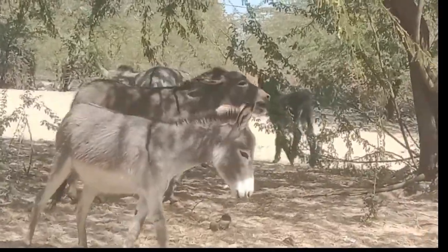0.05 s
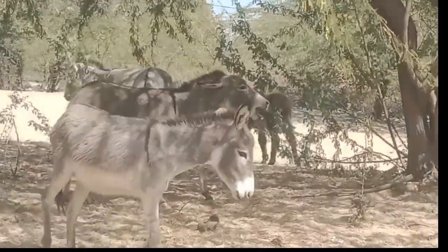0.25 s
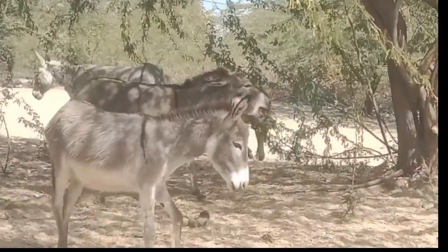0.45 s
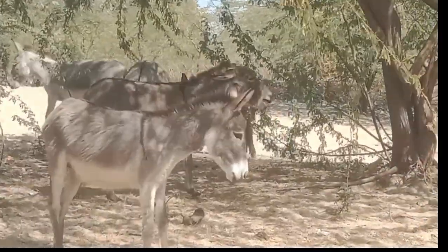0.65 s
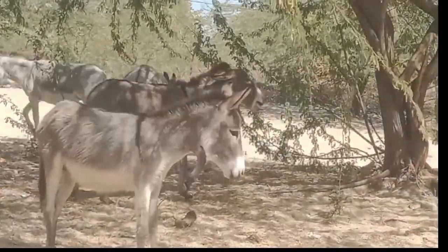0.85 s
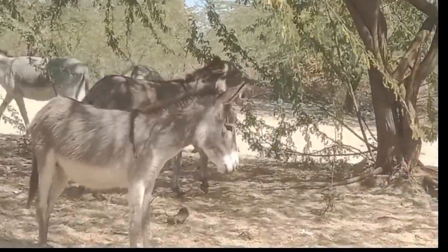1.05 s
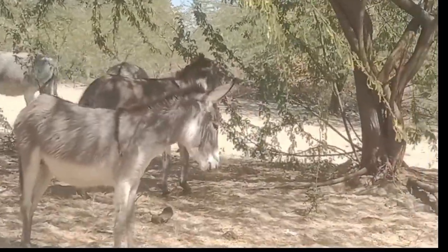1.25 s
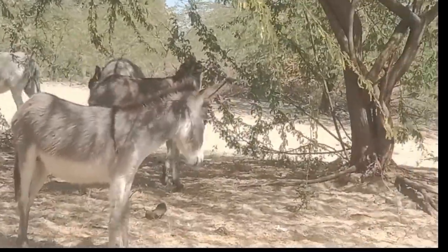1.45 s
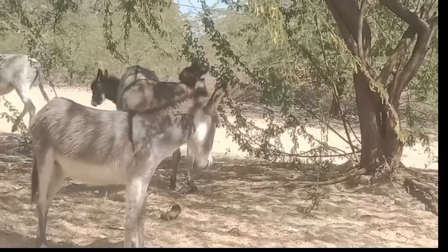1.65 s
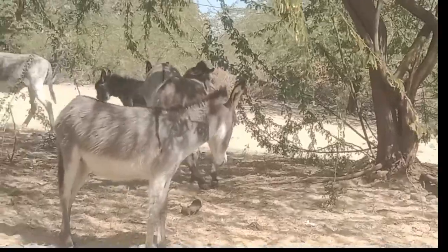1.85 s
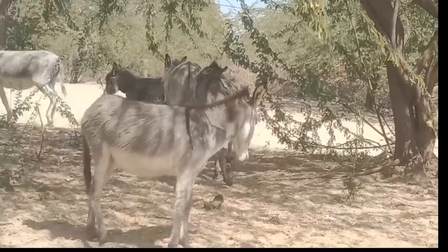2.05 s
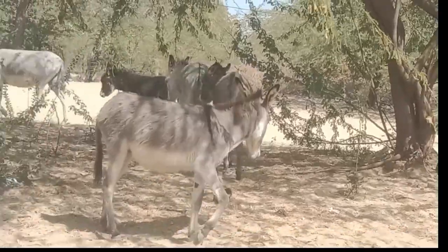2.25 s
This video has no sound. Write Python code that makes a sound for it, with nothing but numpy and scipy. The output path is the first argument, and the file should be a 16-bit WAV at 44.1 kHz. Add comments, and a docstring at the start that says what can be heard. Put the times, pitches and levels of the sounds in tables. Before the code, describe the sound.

A donkey brays: a wheezing in-breath, a loud rasping haw, another wheeze, then a weaker haw that sinks to a grunt. It is heard outdoors with a faint echo from trees, over a thin hiss and low rumble.

```python
"""A wheezing in-breath opens a donkey's bray: then a loud rasping haw, a second wheeze,
and a weaker haw that sinks to a grunt. The vocal folds give a clean low note and a rasp of
uneven puffs; the tight airway hisses and whistles. Trees send back a faint echo.
Behind lie a thin hiss, a low rumble, a twig's tick and one far chirp."""
import sys
import numpy as np
from scipy import signal
from scipy.fft import rfft, irfft
from scipy.io import wavfile
from scipy.ndimage import uniform_filter1d, map_coordinates

SR = 44100
rng = np.random.default_rng(int(sys.argv[2]) if len(sys.argv) > 2 else 0)


def to_wav(sig):
    """Store sig (one row per channel, or 1-D mono) as 16-bit WAV at the path in sys.argv[1].

    Samples outside -1..1 are clipped; the rate is SR.
    """
    pcm = np.clip(np.atleast_2d(sig), -1, 1) * 32767
    pcm = np.round(pcm).astype(np.int16)
    wavfile.write(sys.argv[1], SR, pcm.T)  # frames by channels


N = 105840
TIME = np.arange(N) / SR
BIN_HZ = np.arange(N // 2 + 1) * SR / N


def from_db(db):
    return 10 ** (np.asarray(db) / 20)


def unit_rms(x):
    return x / np.sqrt(np.mean(x ** 2) + 1e-20)


def noise():
    return rng.standard_normal(N)


def drift(rate_hz):
    """Random wander up to about rate_hz; rms 1."""
    return unit_rms(irfft(rfft(noise()) / (1 + (BIN_HZ / rate_hz) ** 4), N))


def curves(rows):
    """One curve per column after time_s."""
    time_s, *columns = np.transpose(rows)
    return [np.interp(TIME, time_s, column) for column in columns]


def gate(rows, fade_s=0.017):
    """Open over a table's time span, fading outside it."""
    inside_s = np.minimum(TIME - rows[0][0], rows[-1][0] - TIME)
    return np.clip(1 + inside_s / fade_s, 0, 1) ** 2


def colour(x, spectrum, skirt_db_per_octave=24):
    """Filter by a spectrum that rolls off beyond its ends; rms 1."""
    hz, db = np.transpose(spectrum)
    octaves, knots = np.log2(BIN_HZ + 1), np.log2(hz)
    outside = np.maximum(octaves - knots[-1], 0) + np.maximum(knots[0] - octaves, 0)
    gain_db = np.interp(octaves, knots, db) - skirt_db_per_octave * outside
    return unit_rms(irfft(rfft(x) * from_db(gain_db), N))


def steady(x, window_samples):
    """Hold the short-term rms at 1."""
    return x / np.sqrt(np.abs(uniform_filter1d(x * x, window_samples)) + 1e-9)


def airway(x, spectrum, depth_db, width_hz=112, life_s=0.038):
    """Airway colour at a steady level; moving soft tissue makes narrow resonances come and go."""
    hz, time_s, frames = signal.stft(x, SR, nperseg=1024)
    across = np.exp(-0.5 * ((hz[:21] - hz[10]) / width_hz) ** 2)
    along = np.exp(-0.5 * ((time_s[:31] - time_s[15]) / life_s) ** 2)
    patches = signal.fftconvolve(rng.standard_normal(frames.shape), np.outer(across, along), "same")
    gain = from_db(depth_db * np.clip(unit_rms(patches), -2, 2))
    shifting = signal.istft(frames * gain, SR, nperseg=1024)[1][:N]
    return steady(colour(shifting, spectrum), 800)


def sway(x, depth=0.012, rate_hz=12):
    """The airway tightens and slackens, pulling its resonances up and down."""
    offset_samples = np.cumsum(depth * drift(rate_hz))
    return map_coordinates(x, [np.arange(N) + offset_samples], order=5, mode="mirror")


# In-breath envelopes: time_s, rush_db, hiss_db
FIRST_BREATH = [(0.0, -34.5, -34), (0.018, -42.5, -39), (0.134, -44, -39), (0.178, -47, -44),
                (0.2, -42, -49.5)]
SECOND_BREATH = [(0.82, -40.5, -78), (0.834, -41, -73), (0.886, -48.5, -83), (0.91, -47.5, -63),
                 (0.93, -43.5, -50), (0.984, -46.5, -46), (1.0, -45, -41), (1.108, -44, -44),
                 (1.134, -46, -45), (1.28, -48, -61.5)]
# Throat rush and hiss spectra: freq_hz, level_db
FIRST_RUSH = [(300,-18.5),(500,-28.5),(880,7.5),(1100,0),(1750,2.5),(2020,3.5),(2250,-2.5),(2800,-1),(3100,-17.5),(4000,-23)]
FIRST_HISS = [(2600,-30.5),(3400,-4.5),(4100,-3.5),(5050,1.5),(5600,-1.5),(6150,-5),(6450,-10),(7700,-14.5),(8150,-24),(8700,-26.5),(9300,-44.5)]
SECOND_RUSH = [(300,-35),(570,-31.5),(780,-11.5),(950,-19.5),(1350,-3),(1650,-2),(1980,0),(2800,-4),(3050,-26.5),(4000,-39.5)]
SECOND_HISS = [(3200,-32.5),(3750,-6.5),(4450,-2.5),(5250,5.5),(6300,-3.5),(6850,-15.5),(7850,-12),(8200,-44),(9000,-47)]


def in_breath(envelope, rush_spectrum, hiss_spectrum):
    """Air drawn through the tight throat, fluttering."""
    rush_db, hiss_db = curves(envelope)
    flutter = from_db(1.6 * drift(72))
    rush = from_db(rush_db + 3) * airway(noise(), rush_spectrum, depth_db=5)
    hiss = from_db(hiss_db - 4) * sway(airway(noise(), hiss_spectrum, depth_db=5))
    return gate(envelope) * flutter * (rush + hiss)


def wavering_tone(track, width_hz, shimmer_db):
    """A sine, unsteady in pitch and level."""
    pitch_hz, level_db = curves(track)
    phase = 2 * np.pi * np.cumsum(pitch_hz + width_hz * drift(170)) / SR
    return gate(track) * from_db(level_db + shimmer_db * drift(90)) * np.sqrt(2) * np.sin(phase)


# Airway tones: width_hz, track of (time_s, pitch_hz, level_db)
WHISTLES = [ (104.9, [(0,5120,-29),(.025,5000,-44),(.085,5030,-40),(.115,4850,-44.5),(.14,4350,-43),(.155,4180,-56.5)]),
            (60, [(.18,4770,-50),(.205,4770,-40.5),(.222,4420,-43)]),
            (30, [(.355,1597,-29),(.368,1544,-24),(.398,1470,-40.5),(.42,1217,-24.5),(.43,1170,-34.5)]),
            (55, [(0,2560,-40.5),(.055,2540,-47.5),(.125,2525,-39.5),(.17,2565,-46.5)]),
            (25, [(.125,6170,-63),(.146,6130,-38.5),(.165,6160,-71),(.232,6100,-47)]),
            (32.4, [(.625,1083,-29.5),(.65,1093,-22),(.705,1137,-18),(.72,1176,-28.5),(.755,1202,-22),(.772,1209,-35),(.787,1065,-21),(.8,1086,-26.5),(.812,1043,-55),(.875,1088,-37.5),(.92,1040,-62)]),
            (69.6, [(.908,5960,-55.5),(.925,6100,-43),(.945,6370,-55.5),(.98,5910,-54.5)]),
            (70, [(.907,4180,-48.5),(.92,4200,-54.5),(.933,4090,-36),(.95,4244,-69.5)]),
            (50.3, [(.928,4630,-61),(.94,4730,-42.5),(.965,4690,-40),(.985,4930,-52.5)]),
            (44.2, [(.99,2450,-56),(1.003,2420,-32),(1.02,2350,-60)]),
            (45.4, [(1.03,1908,-42.5),(1.12,1927,-45.5),(1.124,1875,-31.5),(1.138,1959,-30.5),(1.157,1930,-39.5),(1.172,1845,-33),(1.195,1914,-42.5),(1.25,1920,-43)]),
            (42.7, [(1.35,1230,-37),(1.4,1406,-30),(1.44,1331,-36),(1.485,1402,-30)]),
            (35.2, [(1.495,2400,-48),(1.525,2590,-44.5),(1.575,2432,-43.5),(1.6,2590,-49.5)])]


def whistles():
    """The tight airway whistles and squeals through breaths and haws."""
    return sum(wavering_tone(track, width_hz, shimmer_db=2.5) for width_hz, track in WHISTLES)


# Background hiss spectrum: freq_hz, level_db
FAR_HISS = [(150,-61.5),(250,-20),(1030,-24),(1400,-3),(1960,-1),(2480,-7),(2800,-5),(3380,-30),(8430,-47.5),(15500,-51.5)]


def far_hiss():
    """A thin, constant hiss."""
    return from_db(-59.5) * colour(noise(), FAR_HISS)


# Rumble spectrum: freq_hz, level_db
RUMBLE_SPECTRUM = [(25,-43.5),(62,-23),(90,-9.5),(120,4),(200,-11.5),(260,-36.5),(800,-92)]
# Rumble envelope: time_s, level_db
RUMBLE_ENVELOPE = [(0,-45),(.11,-45),(.18,-58.5),(.23,-47),(.47,-42),(.55,-60),(.62,-49),(.82,-46),(1.2,-47),(1.23,-66.5),(1.36,-46.5),(1.44,-48.5),(1.47,-68),(1.6,-60.5),(1.88,-47.5),(2.02,-78.5),(2.39,-57)]


def rumble():
    """Low noise that swells, dips and flutters."""
    level_db, = curves(RUMBLE_ENVELOPE)
    flutter_db = 3.5 * drift(25)
    return from_db(level_db - 1 + flutter_db) * steady(colour(noise(), RUMBLE_SPECTRUM), 1800)


# Ground and trunk reflections: delay_s, gain_db
REFLECTIONS = [(.0053,-17.5),(0.0129,-13.5),(.031,-20.5)]


def tree_echo(x, tail_delay_s=0.092, t60_s=0.86, band_hz=(900, 3500)):
    """Near reflections, then a dull tail scattered by the leaves."""
    near = sum(from_db(db) * np.interp(TIME - delay_s, TIME, x, left=0) for delay_s, db in REFLECTIONS)
    tail = noise() * from_db(-60 * TIME / t60_s) * (TIME > tail_delay_s)
    bandpass = signal.butter(2, band_hz, "band", fs=SR, output="sos")
    tail = signal.sosfilt(bandpass, tail / np.linalg.norm(tail))
    return near + from_db(-27) * signal.fftconvolve(x, tail)[:N]


def fold_cycles(pitch_hz, jitter, rate_hz=110):
    """Phase of the unevenly vibrating vocal folds, in cycles."""
    return np.cumsum(pitch_hz * (1 + jitter * drift(rate_hz))) / SR


def fold_pulses(cycles, snap_share, sharpness=0.64):
    """One puff of air per cycle; snap_share of the power goes to unevenly timed snaps."""
    closures = np.maximum.accumulate(np.floor(cycles + 0.12 * drift(250)))
    snaps = unit_rms(np.diff(closures, prepend=closures[0]))
    puffs = unit_rms(noise() * np.exp(sharpness * np.cos(2 * np.pi * cycles)))
    shimmer = from_db(-drift(201.8))
    return shimmer * (np.sqrt(snap_share) * snaps + np.sqrt(1 - snap_share) * puffs)


# Fold harmonics: multiple, loud_haw_db, sinking_haw_db, second_note_db
HARMONICS = [(1,-4,-3,-4.5),(2,-18.5,-17.5,-16),(3,-10,-19.5,-11),(4,-8.5,-28.5,-19),(5,-15,-37,-42.5),(6,-26.5,-43.5,-28.5)]


def fold_note(cycles, column, shimmer_db):
    """The folds' clean note; each harmonic shimmers separately."""
    note = np.zeros(N)
    for row in HARMONICS:
        note += from_db(row[column] + shimmer_db * drift(45)) * np.sin(2 * np.pi * row[0] * cycles)
    return np.sqrt(2) * note


# Loud haw: time_s, pitch_hz, note_db, rasp_db, upper_rasp_db, fizz_db, top_fizz_db
LOUD_HAW = [(0.21, 369.8, -62.5, -42.5, -35, -54, -73.5), (0.216, 369.4, -55, -20, -60, -46.5, -64),
            (0.234, 373.7, -27, -16, -32.5, -51.5, -62), (0.292, 365.4, -20, -19.5, -31, -42, -51),
            (0.43, 371.1, -23, -18.5, -26, -47, -55.5), (0.446, 356, -16.5, -18.5, -28, -44.5, -51.5),
            (0.474, 355.6, -23.5, -16.5, -27.5, -54, -50.5), (0.52, 354.3, -19.5, -20, -28, -47, -49.5),
            (0.63, 359.1, -20.5, -24, -28, -51.5, -52), (0.65, 367.4, -28.5, -21, -34.5, -60.5, -54.5),
            (0.68, 376, -25, -26.5, -27, -49, -48.5), (0.712, 369.6, -30.5, -21, -34.5, -61, -53.5),
            (0.776, 365.6, -47, -29, -31, -63, -62), (0.796, 374, -49, -31.5, -45, -77, -84),
            (0.82, 372.5, -60.5, -42.5, -44.5, -69, -81)]
# Layer trims: note_db, rasp_db, upper_rasp_db, fizz_db, top_fizz_db
LOUD_TRIMS = (-1.6,-1.7,-0.75,-0.51,-1.5)
# Rasp and fizz spectra: freq_hz, level_db
LOUD_RASP = [(200,-33.5),(330,-17.5),(460,-6.5),(570,-23),(700,-12),(830,-13.5),(1060,8),(1170,-1),(1280,3),(1480,3.5),(1650,-1.5),(1760,-18),(2100,-31),(3000,-70)]
LOUD_UPPER_RASP = [(1300,-29),(1800,1.5),(2150,9.5),(2480,11.5),(2830,-1.5),(3050,-5),(3400,-33.5),(4500,-72.5)]
LOUD_FIZZ = [(2400,-20),(3200,3),(4300,2),(5450,-9.5),(6200,-4.5),(7200,-27.5)]
LOUD_TOP_FIZZ = [(5800,-38.5),(6600,3.5),(7000,11.5),(7700,8.5),(8100,-12),(8600,-8),(9200,-43),(15000,-39)]


def loud_haw():
    """A held note, a harsh rasp of puffs and a fizz of air rushing past the folds."""
    pitch_hz, *levels_db = curves(LOUD_HAW)
    cycles = fold_cycles(pitch_hz, jitter=0.011)
    pulses = fold_pulses(cycles, snap_share=0)
    note = fold_note(cycles, column=1, shimmer_db=1.2)
    rasp = steady(colour(pulses, LOUD_RASP), 400)
    upper_rasp = airway(pulses + 0.15 * noise(), LOUD_UPPER_RASP, depth_db=1.5)
    fizz = airway(noise(), LOUD_FIZZ, depth_db=7)
    top_fizz = airway(noise(), LOUD_TOP_FIZZ, depth_db=7)
    layers = zip((note, rasp, upper_rasp, fizz, top_fizz), levels_db, LOUD_TRIMS)
    return gate(LOUD_HAW) * sum(layer * from_db(db + trim_db) for layer, db, trim_db in layers)


def mouth(x, centre_hz, width_hz=286, block=128):
    """The mouth's moving resonance; peak gain 1."""
    radius = np.exp(-np.pi * width_hz / SR)
    b = np.array([1, 0, -1]) * (1 - radius ** 2) / 2
    out, state = np.zeros(N), np.zeros(2)
    for i in range(0, N, block):
        a = [1, -2 * radius * np.cos(2 * np.pi * centre_hz[i] / SR), radius ** 2]
        out[i:i + block], state = signal.lfilter(b, a, x[i:i + block], zi=state)
    return out


# Sinking haw: time_s, note_db, rasp_db, upper_rasp_db, fizz_db
SINKING_HAW = [(1.265,-73,-69,-69,-80),(1.29,-46.5,-41,-47,-69),(1.335,-37,-32,-45.5,-69),(1.41,-42,-29.5,-44,-65),(1.465,-31,-28.5,-34.5,-67.5),(1.525,-30,-29.5,-38.5,-59.5),(1.58,-35.5,-26,-37,-66),(1.675,-33,-31.5,-44.5,-66.5),(1.712,-47.5,-34,-43.5,-67.5),(1.74,-30.5,-42,-46,-66.5),(1.764,-52.5,-38,-46,-72.5),(1.785,-37.5,-42.5,-45.5,-74),(1.884,-39,-78,-46.5,-74),(1.905,-58,-62,-51.5,-76),(1.959,-51,-58,-57.5,-86)]
# Glide with a voice break on the way down: time_s, pitch_hz, mouth_hz
SINKING_GLIDE = [(1.28,259.2,1100),(1.38,344.1,1290),(1.45,351.3,1330),(1.51,331.2,1120),(1.59,295.9,1020),(1.66,261.4,860),(1.71,246,800),(1.735,278.7,800),(1.765,269.9,800),(1.79,228.5,830),(1.82,200.6,900),(1.87,174.2,1200),(1.96,134,1350)]
# Rasp and fizz spectra: freq_hz, level_db
SINKING_RASP = [(200,-31.5),(290,-2),(450,19),(560,0),(680,4.5),(850,6),(1050,5),(1400,4),(1700,0),(2000,-10),(2800,-58)]
SINKING_UPPER_RASP = [(900,-39),(1300,3.5),(1550,6),(2150,3.5),(2520,0.5),(2830,-2),(3050,-25),(4000,-54.5)]
SINKING_FIZZ = [(2500,-36),(3450,7),(4400,1),(5100,-8.5),(5650,-6.5),(7700,-19),(9000,-37.5)]
SINKING_JITTER = 0.03525


def sinking_haw():
    """The breath runs out: the pitch falls, the mouth closes, the folds slacken into a grunt."""
    pitch_hz, mouth_hz = curves(SINKING_GLIDE)
    wobble = 1 + 0.015 * drift(27.6)
    cycles = fold_cycles(pitch_hz * wobble, SINKING_JITTER)
    pulses = fold_pulses(cycles, snap_share=0.19)
    note = fold_note(cycles, column=2, shimmer_db=2.5)
    rasp = airway(mouth(pulses, mouth_hz) + 0.076 * pulses, SINKING_RASP, depth_db=1.5)
    upper_rasp = airway(pulses + 3.1 * noise(), SINKING_UPPER_RASP, depth_db=1.5)
    fizz = airway(noise(), SINKING_FIZZ, depth_db=7)
    layers = zip((note, rasp, upper_rasp, fizz), curves(SINKING_HAW))
    return gate(SINKING_HAW) * sum(layer * from_db(db) for layer, db in layers) + grunt(pulses)


# Second fold vibration: time_s, pitch_hz, level_db
SECOND_NOTE = [(1.281,330,-44.5),(1.33,394.6,-49),(1.37,443,-28),(1.44,454.6,-23),(1.48,434.5,-32.5),(1.6,450,-55),(1.779,435,-56),(1.825,402.8,-42),(1.875,353.5,-45),(1.915,387,-53),(1.95,352,-63.5)]


def second_note():
    """In the sinking haw the folds also flap at an unrelated pitch."""
    pitch_hz, level_db = curves(SECOND_NOTE)
    cycles = fold_cycles(pitch_hz, SINKING_JITTER, rate_hz=109)
    return gate(SECOND_NOTE) * from_db(level_db) * fold_note(cycles, column=3, shimmer_db=1)


# Twig spectrum: freq_hz, level_db
TWIG_SPECTRUM = [(8200,-5),(10500,-21),(12700,-4),(15000,-26.5)]


def twig(start_s=1.306, level_db=-74, t60_s=0.04):
    """One tiny dry snap on the ground."""
    age_s = TIME - start_s
    envelope = (age_s > 0) * from_db(level_db - 60 * np.abs(age_s) / t60_s)
    return envelope * colour(noise(), TWIG_SPECTRUM)


# Grunt envelope: time_s, level_db
GRUNT_ENVELOPE = [(1.58,-51),(1.66,-46.5),(1.76,-46),(1.8,-50),(1.885,-52.5),(1.91,-46.5),(1.955,-78)]
# Grunt spectrum: freq_hz, level_db
GRUNT_SPECTRUM = [(90,-23),(160,3),(240,7),(330,14),(420,1),(540,-33),(900,-55.5)]


def grunt(pulses):
    """Low pulses of the slack folds end the bray."""
    level_db, = curves(GRUNT_ENVELOPE)
    return gate(GRUNT_ENVELOPE) * from_db(level_db) * steady(colour(pulses, GRUNT_SPECTRUM), 1100)


# Bird chirp: time_s, pitch_hz, level_db
CHIRP = [(2.008,5080,-91),(2.028,5180,-80.5),(2.048,5180,-95)]


def bird():
    """One faint, far chirp."""
    return wavering_tone(CHIRP, width_hz=23, shimmer_db=1.5)


def scene():
    """The donkey, its echo and the background, in mono."""
    breaths = in_breath(FIRST_BREATH, FIRST_RUSH, FIRST_HISS)
    breaths += in_breath(SECOND_BREATH, SECOND_RUSH, SECOND_HISS)
    fade_in = np.minimum(TIME / 0.004, 1)
    donkey = fade_in * (breaths + whistles() + loud_haw() + sinking_haw() + second_note())
    return (donkey + tree_echo(donkey) + far_hiss() + rumble() + twig() + bird())[None]


def record(dry):
    """Steep low-pass at 15.5 kHz."""
    return signal.sosfilt(signal.butter(14, 15500, fs=SR, output="sos"), dry)


dry = scene()
out = record(dry)
to_wav(out)
```